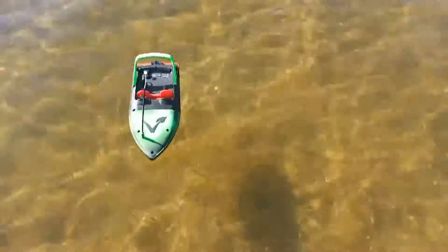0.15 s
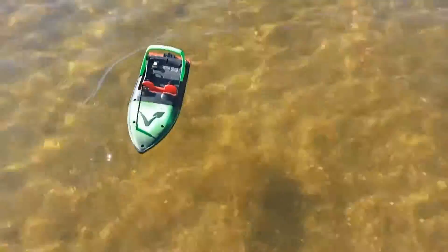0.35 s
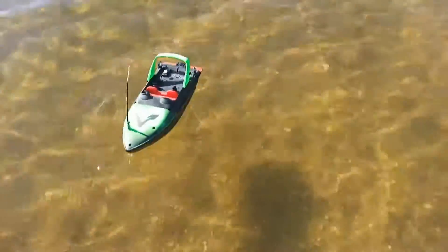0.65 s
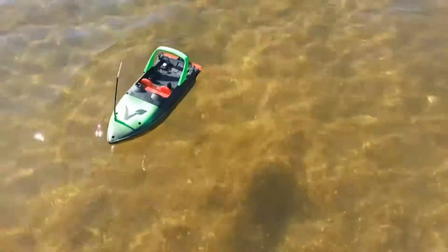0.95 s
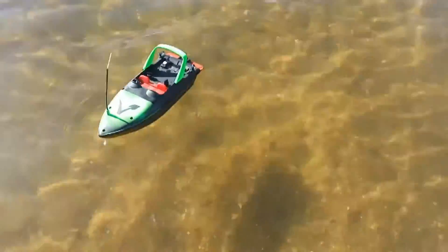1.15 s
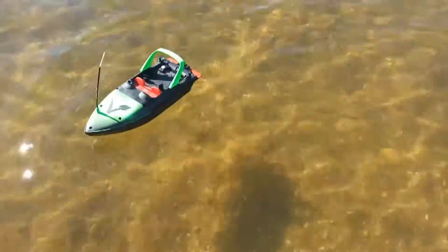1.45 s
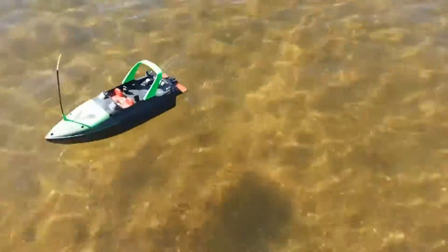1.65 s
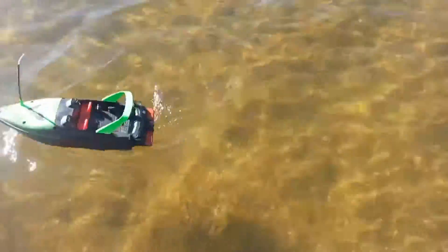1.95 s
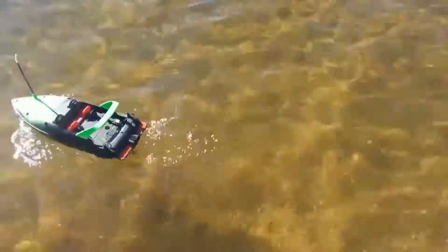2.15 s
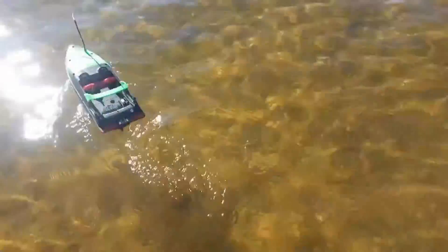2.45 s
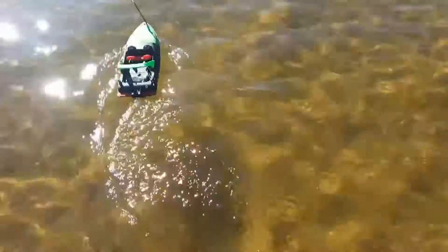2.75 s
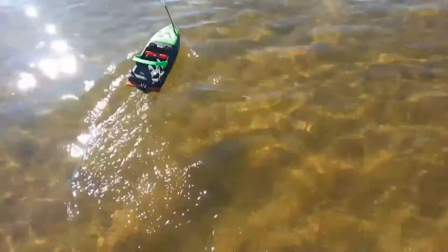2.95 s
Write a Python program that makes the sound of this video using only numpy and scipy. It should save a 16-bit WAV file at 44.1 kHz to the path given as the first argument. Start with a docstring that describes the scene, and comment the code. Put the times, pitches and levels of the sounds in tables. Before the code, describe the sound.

A small electric motor on a model boat starts up in quiet open air: faint beeps and a gritty rattle, then a fast rise to a held whine, with bright chatter, spray and short squeals, somewhat to the left.

```python
"""A model boat's electric motor sings briefly under its speed controller, turns over with a gritty
rattle, then spins up to a whine at multiples of the shaft speed. Shaft chatter and propeller spray
add a bright rasp, the shaft squeals in its tube and the hull drones. The whine changes colour as
the boat swings stern-on. Quiet outdoor air and a faint low hum lie underneath."""
import sys
import numpy as np
from scipy import signal
from scipy.fft import rfft, irfft
from scipy.io import wavfile
from scipy.ndimage import uniform_filter1d

SR = 44100
rng = np.random.default_rng(int(sys.argv[2]) if len(sys.argv) > 2 else 0)


def generate_wav(sig):
    """Save sig (samples, or channels by samples) to the path in sys.argv[1] as 16-bit PCM at SR."""
    pcm = np.round(np.clip(np.atleast_2d(sig).T, -1, 1) * 32767).astype(np.int16)
    wavfile.write(sys.argv[1], SR, pcm)


N = 136710
T = np.arange(N) / SR
HZ = np.fft.rfftfreq(N, 1 / SR)

# Outdoor air. Each row: frequency in Hz, relative level in dB.
AIR_COLOUR_DB = [(25,-12),(70,-8),(140,-8),(270,-19),(500,-18),(900,-25.5),(6500,-30.5),(8200,-39),(13000,-40),(15000,-32)]
# Each row: frequency in Hz, left-right correlation of the air.
AIR_CORRELATION = [(30,0.56),(150,0.62),(2000,0.055)]
# Low hum. Each row: frequency in Hz, rms level in dB.
HUM_DB = [(80,-68),(124.5,-60.5)]

# The boat at the microphones. Each row: frequency in Hz, left minus right in dB.
BALANCE_DB = [(100,1.5),(400,-1.5),(1050,2.5),(1450,7.5),(1750,-0.5),(2150,9.5),(2650,-9.5),(3300,5),(4600,8),(5600,-0.5),(6600,10),(9000,18),(13500,22.5),(15000,11)]
# Each row: frequency in Hz, phase lead of the left in radians.
LEAD_RAD = [(100,-0.15),(400,-0.25),(1000,-0.51),(1500,-1.6),(2400,-1.53)]
# Each row: frequency in Hz, left-right correlation of rattle and rasp.
HULL_CORRELATION = [(400,1),(1000,0.95),(2000,1),(4000,0.58),(15000,.1)]

# Hull drone. Each row: time in seconds, level in dB.
DRONE_DB = [(1.55,-60),(2.0,-53),(2.3,-51),(3.1,-52.5)]
# Winding tone bursts. Each row: start and length in seconds, fundamental and octave in dB.
WINDING_BURSTS = [(0.768,0.25,-57,-72),(1.077,0.028,-64,-52.5),(1.112,0.18,-59,-65)]
# Drive rattle. Each row: time in seconds, level in dB.
RATTLE_DB = [(.77,-74),(.795,-58),(.81,-45.5),(.825,-54),(.857,-40),(.88,-47),(.888,-61),(.902,-51),(.91,-55),(.92,-47.5),(.929,-52),(.951,-44),(.958,-38.5),(.988,-37),(.997,-37),(1.01,-35.5),(1.036,-39),(1.052,-53),(1.1,-58),(1.13,-43.5),(1.2,-47),(1.222,-44.5),(1.24,-46.5),(1.265,-44.5),(1.281,-56),(1.287,-38.5),(1.303,-36),(1.322,-40.5),(1.415,-27.5),(1.55,-60)]
# Hull colouring of rattle and rasp. Each row: frequency in Hz, relative level in dB.
RATTLE_COLOUR_DB = [(140,-18),(270,3.5),(400,-13.5),(650,3),(850,0.5),(1020,-3),(1400,1),(1560,-9.5),(1850,0.5),(2150,-19.5),(3500,-3.5),(4100,-17),(4750,-7.5),(5500,-23),(6500,-10),(8000,-27.5),(15000,-46)]
RASP_COLOUR_DB = [(60,-57),(160,-11),(260,-7),(380,-9),(620,2),(850,-2.5),(1300,5.5),(1800,1),(2150,-6.5),(2500,-5.5),(2900,-3.5),(3500,0),(4200,-3),(4750,0),(5600,-7.5),(6200,-4),(6700,2),(7300,0),(8000,-7.5),(9000,-11),(10200,-6.5),(11800,-14),(13900,-13.5),(15200,-11.5)]
# Rasp. Each row: time in seconds, then low, middle and high band in dB before trim.
RASP_BANDS_DB = [(1.27,-55,-60.5,-67),(1.37,-32,-36.5,-36.5),(1.47,-26.5,-29,-35),(1.63,-29.5,-29.5,-33),(1.73,-28,-27.5,-32.5),(1.92,-27.5,-26.5,-33.5),(2.13,-26.5,-26,-33),(2.45,-26,-29,-33.5),(2.8,-28,-31,-33.5),(3.1,-29,-29,-32.5)]
# Each row: frequency in Hz, share of rasp power that repeats every turn.
CHATTER_SHARE = [(300,.01),(1400,0.52),(3300,0.49),(5500,0.43)]
# Shaft squeals. Each row: centre and length in seconds, pitch in Hz, level in dB.
SQUEAL_EVENTS = [(1.035,0.017,1360,-38.5),(1.521,0.11,6770,-35),(1.598,0.44,1780,-34.5),(1.74,0.083,3235,-33),(1.747,0.14,6760,-32.5),(1.897,0.11,6310,-32.5),(2.022,0.084,4730,-32),(2.304,0.11,4630,-35),(2.537,0.15,5190,-35),(2.724,0.14,6600,-33),(2.827,0.18,6530,-34),(2.91,0.093,3367,-33)]

# Shaft speed. Each row: time in seconds, turns per second.
SHAFT_HZ = [(0.77,20),(1.27,25),(1.355,41),(1.385,48.5),(1.42,62),(1.44,81),(1.46,91.5),(1.5,96.8),(1.6,100.6),(1.7,101.8),(1.94,102.8),(2.08,104.4),(2.23,104.1),(2.39,102.8),(2.64,104.3),(2.84,103.2),(3.1,103.1)]
# Motor whine. Each row: time in seconds, level in dB.
WHINE_DB = [(1.35,-67.5),(1.42,-53),(1.49,-29),(1.65,-36),(2.08,-33),(2.7,-35),(3.1,-32.5)]
# Each row: multiple of shaft speed, then broadside and astern level in dB relative to WHINE_DB.
WHINE_PARTIALS = [(2,-20,-17.5),(6,-16.5,-34),(8,-24,-29),(11,-11,-6),(12,-15,-9.5),(13,-13,-14.5),(15,-40,-12.5),(16,-25,-12.5),(18,-11,-10),(28,-14.5,-9)]
# Hull ringing at the numbered multiple of shaft speed. Each row: time in seconds, level in dB.
RING_3_DB = [(1.42,-74),(1.49,-39.5),(2.1,-47.5),(2.35,-42.5),(2.6,-49),(3.1,-51)]
RING_4_DB = [(1.48,-49),(1.62,-46.5),(1.9,-44),(1.99,-40.5),(2.2,-63),(2.35,-42.5),(2.75,-58),(2.95,-49.5)]
RING_7_DB = [(1.42,-71),(1.475,-37),(1.6,-42),(1.9,-59),(2.15,-46.5),(2.7,-60)]
RING_9_DB = [(1.5,-51.5),(2.5,-43.5),(2.8,-42.5),(3.1,-35.5)]
RING_10_DB = [(1.4,-54),(1.52,-34.5),(1.65,-43.5),(1.85,-34.5),(1.95,-52),(2.04,-39.5),(2.2,-33.5),(2.42,-30.5),(2.55,-28.5),(2.72,-27),(2.86,-30.5),(2.97,-30.5),(3.1,-38)]
RING_14_DB = [(1.33,-56),(1.38,-39),(1.45,-43),(1.48,-27.5),(1.6,-52),(1.75,-36.5),(1.87,-32.5),(1.96,-49.5),(2.2,-32),(2.42,-42),(2.6,-28.5),(2.78,-30.5),(2.9,-32),(3.1,-34)]
RING_17_DB = [(1.45,-58),(1.56,-34.5),(1.62,-30),(1.7,-30.5),(1.88,-34.5),(2.0,-46.5),(2.4,-62),(2.85,-35.5),(3.1,-45)]
RING_27_DB = [(1.95,-59),(2.17,-41),(2.45,-56),(2.72,-44),(3.1,-47)]
RING_31_DB = [(2.42,-51),(2.64,-34),(3.1,-45)]
RINGS_DB = {3: RING_3_DB, 4: RING_4_DB, 7: RING_7_DB, 9: RING_9_DB, 10: RING_10_DB,
            14: RING_14_DB, 17: RING_17_DB, 27: RING_27_DB, 31: RING_31_DB}


def amp(db):
    """Decibels to gain."""
    return 10 ** (np.asarray(db) / 20)


def unit(x):
    """Scale to rms 1."""
    return x / np.sqrt(np.mean(x ** 2) + 1e-20)


def at_hz(rows, hz=HZ):
    """Interpolate a table over log frequency."""
    row_hz, value = np.transpose(rows)
    return np.interp(np.log(hz + 1), np.log(row_hz + 1), value)


def curve(rows, column=1):
    """Interpolate a time table at every sample."""
    rows = np.array(rows)
    return np.interp(T, rows[:, 0], rows[:, column])


def envelope(rows, column=1):
    """Gain from a dB column, fading in over the 10 ms before its first row."""
    return amp(curve(rows, column)) * np.clip((T - rows[0][0]) * 100 + 1, 0, 1)


def drift(rate_hz):
    """Smooth random motion of rms 1."""
    size = N // 64
    hz = np.fft.rfftfreq(size, N / size / SR)
    slow = irfft(rfft(rng.standard_normal(size)) * np.exp(-(hz / rate_hz) ** 2), size)
    return unit(np.interp(T, np.linspace(0, T[-1], size), slow))


def resonate(x, hz, width_hz):
    """Double-pole resonance, output rms 1."""
    carrier = np.exp(2j * np.pi * hz * T)
    pole = np.exp(-np.pi * width_hz / SR)
    baseband = signal.lfilter([(1 - pole) ** 2], [1, -2 * pole, pole ** 2], x / carrier)
    return unit((carrier * baseband).real)


def mic_gains(hz):
    """Complex left and right gains for sound from the boat."""
    left = amp(at_hz(BALANCE_DB, hz) / 2) * np.exp(.5j * at_hz(LEAD_RAD, hz))
    pair = np.array([left, 1 / left])
    return pair / abs(pair.mean(0))


def correlate(pair, correlation):
    """Mix two independent waves into a partly correlated stereo spectrum."""
    left, other = rfft(pair)
    shared = np.clip(at_hz(correlation), 0, 1)
    return np.array([left, shared * left + np.sqrt(1 - shared ** 2) * other])


def unit_wave(spectrum):
    """Stereo wave whose mid signal has rms 1."""
    x = irfft(spectrum, N)
    return x / x.mean(0).std()


def background(air_db=-60, hum_width_hz=3.4):
    """Quiet outdoor air and a wavering low hum."""
    noise = correlate(rng.standard_normal((2, N)), AIR_CORRELATION)
    air = unit_wave(noise * amp(at_hz(AIR_COLOUR_DB)))
    hum = sum(amp(db) * resonate(rng.standard_normal(N), hz, hum_width_hz) for hz, db in HUM_DB)
    return amp(air_db) * air + hum


def drone():
    """A low hull resonance, shaken once the boat is under way."""
    return envelope(DRONE_DB) * resonate(rng.standard_normal(N), hz=179.5, width_hz=3.6)


def windings(switch_hz=1407, edge_s=0.0044, waver_db=3):
    """Pulsed current makes the barely moving motor sing at the controller's switching rate."""
    phase = 2 * np.pi * switch_hz * T
    tone = np.zeros(N)
    for start_s, length_s, fundamental_db, octave_db in WINDING_BURSTS:
        gate = np.clip(np.minimum(T - start_s, start_s + length_s - T) / edge_s, 0, 1)
        tone += gate * (amp(fundamental_db) * np.sin(phase) + amp(octave_db) * np.sin(2 * phase))
    tone *= np.sqrt(2) * amp(waver_db * drift(rate_hz=40))
    return irfft(rfft(tone) * mic_gains(HZ), N)


def grit(click_share, clicks_per_s, spread_db, gate=1):
    """Random clicks and hiss; the gate scales click rate and hiss level."""
    strength = amp(spread_db * np.minimum(rng.exponential(1, N), 4))
    hits = rng.random(N) < clicks_per_s * gate / SR
    clicks = unit(strength * hits * rng.choice([-1, 1], N))
    hiss = unit(gate * rng.standard_normal(N))
    return np.sqrt(click_share) * clicks + np.sqrt(1 - click_share) * hiss


def hull(pair, colour_db, patch_db):
    """Stereo spectrum of two excitations coloured by the hull, with drifting spectral patches."""
    frames = signal.stft(np.array(pair), nperseg=512)[2]
    patches = uniform_filter1d(rng.standard_normal(frames.shape[1:]), size=5, axis=0)
    patches = unit(uniform_filter1d(patches, size=16, axis=1))
    patchy = signal.istft(frames * amp(patch_db * patches), nperseg=512)[1][:, :N]
    return correlate(patchy, HULL_CORRELATION) * mic_gains(HZ) * amp(at_hz(colour_db))


def rattle():
    """The slowly turning drive knocks in the hull."""
    pair = [grit(click_share=0.6, clicks_per_s=910, spread_db=1) for _ in range(2)]
    return envelope(RATTLE_DB) * unit_wave(hull(pair, RATTLE_COLOUR_DB, patch_db=5.5))


def chatter(turns, surfaces=5, steps_per_turn=32768):
    """Rough contact repeating every shaft turn, from a drifting blend of random surfaces."""
    position = (turns * steps_per_turn).astype(int) % steps_per_turn
    contact, power = 0, 0
    for _ in range(surfaces):
        surface = unit(irfft(rfft(rng.standard_normal(290))[:-1], steps_per_turn))
        weight = drift(rate_hz=3.77)
        contact += weight * surface[position]
        power += weight ** 2
    return unit(contact / np.sqrt(power))


def squeals(turns):
    """The shaft rubs in its tube, ringing resonances that swell and fade."""
    rub = chatter(turns) + rng.standard_normal(N)
    out = np.zeros(N)
    for centre_s, length_s, hz, db in SQUEAL_EVENTS:
        swell = np.cos(np.pi * np.clip((T - centre_s) / length_s, -.5, .5))
        ring = swell * resonate(rub, hz, width_hz=86)
        out += amp(db) * ring * np.linalg.norm(swell) / np.linalg.norm(ring)
    return irfft(rfft(out) * mic_gains(HZ), N)


def rasp(turns, pulse_depth=0.22, crossovers_hz=(1900, 6650), trims_db=(-4, 0, -1.5)):
    """Buzzing shaft chatter and irregular propeller spray, pulsing once and twice a turn."""
    gate = np.exp(pulse_depth * (np.cos(2 * np.pi * turns) + np.cos(4 * np.pi * turns)) / 2)
    share = at_hz(CHATTER_SHARE)
    pair = []
    for _ in range(2):
        buzz = rfft(unit(gate * chatter(turns)))
        spray = rfft(grit(click_share=0.86, clicks_per_s=3000, spread_db=1.5, gate=gate))
        pair.append(irfft(np.sqrt(share) * buzz + np.sqrt(1 - share) * spray, N))
    spectrum = hull(pair, RASP_COLOUR_DB, patch_db=2.13)
    band = np.searchsorted(crossovers_hz, HZ)
    return sum(unit_wave(spectrum * (band == k)) * envelope(RASP_BANDS_DB, column=k + 1) * amp(db)
               for k, db in enumerate(trims_db))


def whine(turns, swing_start_s=2.45, swing_end_s=2.48, waver_db=1.6):
    """Wavering multiples of shaft speed: some shift level as the boat swings, others ring the hull."""
    astern = np.clip((T - swing_start_s) / (swing_end_s - swing_start_s), 0, 1)
    direct = [(multiple, envelope(WHINE_DB) * amp(side_db + astern * (stern_db - side_db)))
              for multiple, side_db, stern_db in WHINE_PARTIALS]
    ringing = [(multiple, envelope(rows)) for multiple, rows in RINGS_DB.items()]
    cruise_hz = SHAFT_HZ[-1][1]
    out = np.zeros((2, N))
    for multiple, gain in direct + ringing:
        waver = amp(waver_db * drift(rate_hz=10.6))
        tone = np.exp(2j * np.pi * (multiple * turns + rng.random()))
        out += np.sqrt(2) * gain * waver * (mic_gains(multiple * cruise_hz)[:, None] * tone).real
    return out


def scene(jitter_turns=0.0023):
    """The boat over the background; one shaft angle drives whine, rasp and squeals."""
    turns = np.cumsum(curve(SHAFT_HZ)) / SR + jitter_turns * drift(rate_hz=37.7)
    return whine(turns) + rasp(turns) + squeals(turns) + rattle() + drone() + windings() + background()


def record(dry):
    """Low-pass at 15650 Hz."""
    lowpass = signal.firwin(511, 15650, window=("kaiser", 9), fs=SR)
    return signal.oaconvolve(dry, lowpass[None], "same")


dry = scene()
out = record(dry)
generate_wav(out)
```